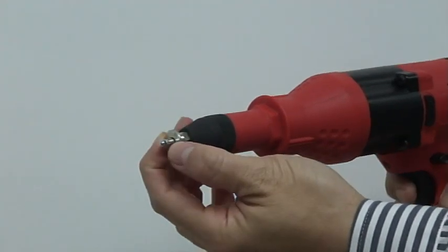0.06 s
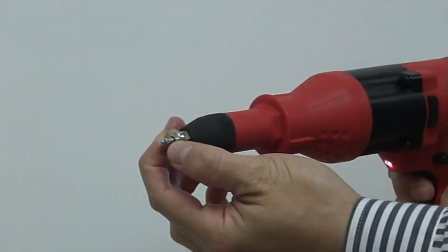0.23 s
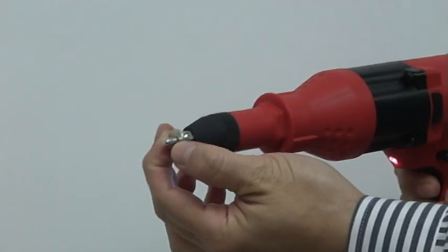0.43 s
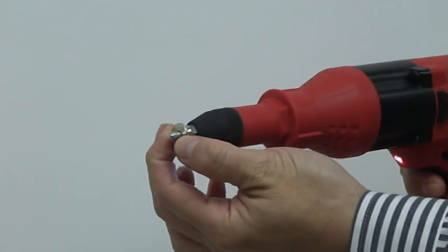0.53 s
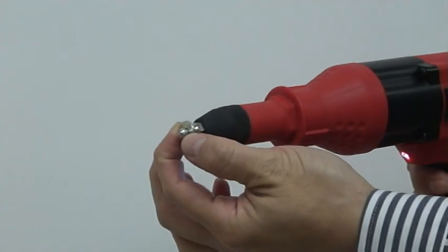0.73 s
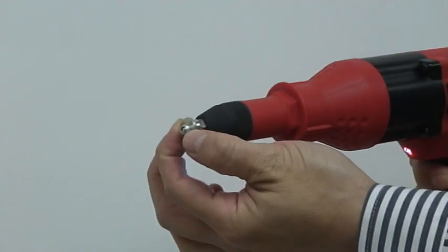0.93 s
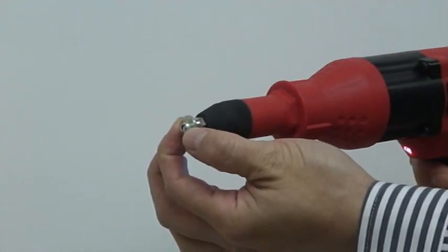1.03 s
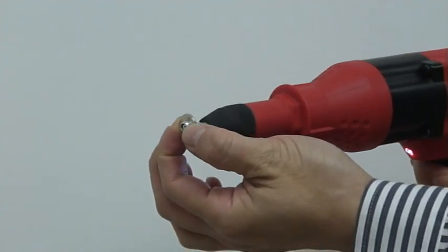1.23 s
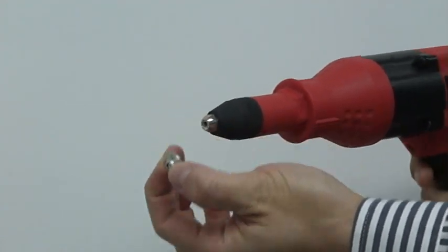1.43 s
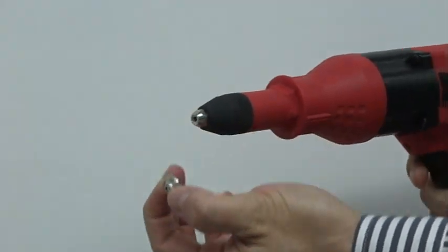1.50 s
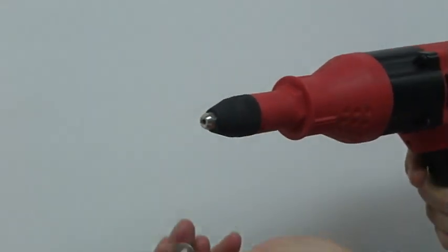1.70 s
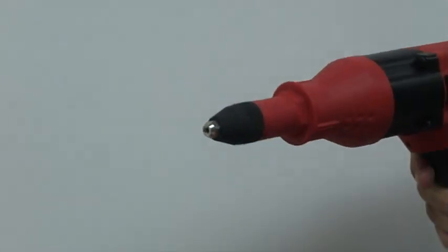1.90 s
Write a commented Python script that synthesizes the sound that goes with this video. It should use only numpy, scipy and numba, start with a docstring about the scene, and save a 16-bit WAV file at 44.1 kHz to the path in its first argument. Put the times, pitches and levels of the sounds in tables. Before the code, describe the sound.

A cordless rivet gun whines up, rattles rapidly, snaps a rivet and winds down.

```python
"""A cordless rivet gun sets one rivet near a wall in a bare room. The trigger clicks, the motor whines
up through its gears and the jaws bite. The loaded drive knocks about forty times a second, ringing the
casing, until the mandrel snaps. Freed, the motor speeds up again, then winds down as the room rings on
over a low rumble of air. An automatic gain control ducks under the knocking and slowly recovers."""
import sys
import numpy as np
from scipy import signal
from scipy.fft import rfft, irfft
from scipy.io import wavfile
from scipy.ndimage import uniform_filter1d
from numba import njit

SR = 44100
rng = np.random.default_rng(int(sys.argv[2]) if len(sys.argv) > 2 else 0)


def transcribe(signal):
    """Save signal, clipped to [-1, 1], as a 16-bit WAV file at the path in sys.argv[1]."""
    frames = np.atleast_2d(signal).T
    limited = np.clip(frames, -1, 1)
    pcm = np.round(limited * 32767).astype(np.int16)
    wavfile.write(sys.argv[1], SR, pcm)


N = 85995

# motor speed, heard as the pitch of the meshing gears: time_s, pitch_hz
MESH_PITCH = [(.15, 700), (.2, 2437), (.238, 3290), (.27, 3750), (.3, 4049), (.33, 4165), (.348, 4100),
              (.37, 3790), (.42, 2400), (1.07, 2650), (1.13, 3820), (1.178, 4200), (1.23, 4390),
              (1.275, 4440), (1.31, 4340), (1.345, 4050), (1.4, 2400), (1.5, 500)]
# envelope of the gear whine: time_s, level_db
WHINE_LEVEL = [(.14, -110), (.18, -42), (.21, -55), (.245, -32.5), (.268, -26.5), (.33, -26), (.365, -25),
               (.4, -57), (1.1, -48), (1.18, -24.5), (1.27, -32.5), (1.34, -25), (1.37, -43), (1.44, -110)]
# low partials of the whine: mesh_multiple, level_db
WHINE_PARTIALS = [(.3333, -15), (1, 0)]
# second and third harmonics against the mesh tone: time_s, level_db
OVERTONE_LEVEL = [(.27, -17), (.33, -22), (1.15, -12), (1.3, -11)]
# the planet gears wobble the whine, most as the jaws take hold: time_s, depth
WHINE_WOBBLE = [(.32, 0.051), (.34, 1), (.355, 0.85), (.38, .2)]
# envelope of the gear rattle: time_s, level_db
RATTLE_LEVEL = [(.12, -70.5), (.158, -51), (.195, -34), (.25, -32), (.3, -27.5), (.345, -29), (.372, -13),
                (.41, -15), (.7, -21), (1.06, -19.5), (1.12, -19.5), (1.2, -23), (1.345, -25),
                (1.42, -34.5), (1.53, -40), (1.68, -77.5)]
# bright scrape against the plain rattle: time_s, balance_db
SCRAPE_BALANCE = [(.15, -7.5), (.3, 2), (.36, -0.5), (.42, -3), (1.08, -1.5), (1.13, -4), (1.35, -4.5),
                  (1.45, -30)]
# tone of the rattling and of the scraping teeth: frequency_hz, gain_db
RATTLE_EQ = [(100, -42.5), (250, -7.5), (600, -1.5), (1200, -2), (2400, 1.5), (3000, 1), (4400, 3.5),
             (4900, -2), (7000, -10.5), (10500, -16), (16000, -84)]
SCRAPE_EQ = [(150, -27), (600, -4), (1300, 5), (3000, -7), (5200, 3), (7000, 2), (8300, -2.5), (9800, 3.5),
             (11000, -2), (12000, 3.5), (14500, -2.5), (16500, -1)]
# tempo of the loaded drive: time_s, knocks_per_s
KNOCK_TEMPO = [(.373, 37.8), (.44, 38), (.49, 39.9), (.7, 40), (.87, 40.3), (.96, 41.9), (1.04, 43.8),
               (1.09, 44)]
# strength of the knocks: time_s, level_db
KNOCK_STRENGTH = [(.373, -1), (.42, -3), (.6, -3), (.85, -4), (.97, -3), (1.06, -3.5), (1.09, -8)]
# lighter gear ticks, placed and balanced against each knock: delay_turns, level_db
OFFBEAT_TICKS = [(.51, -17), (.87, -14)]
# tone of the knocks and trigger clicks: frequency_hz, gain_db
KNOCK_EQ = [(90, -43.5), (250, -12), (500, -9.5), (900, 2.5), (1700, -1), (2400, 2), (4300, 1), (6500, 1),
            (8400, -5), (10000, -1.5), (11000, -2.5), (12200, 0.5), (16500, 0.5)]
# the mandrel snaps and recoils: start_s, level_db
SNAP_HITS = [(1.0937, 2.5), (1.0951, 2.5)]
# tone of the biting jaws, the snapping mandrel and the freed jaws: frequency_hz, gain_db
BITE_EQ = [(100, -20.5), (280, -18), (550, 8.5), (1400, 9.5), (2600, 8.5), (4000, -11), (5200, 5),
           (8000, -14), (16000, -30)]
SNAP_EQ = [(120, -33), (300, -30), (1000, -5), (1800, -5.5), (2350, 5.5), (3000, 0.5), (3900, 6.5),
           (4500, -10), (5300, -24), (9000, -14), (12500, -9.5), (16000, -38)]
SHIVER_EQ = [(300, -30), (1500, -15), (2300, 1.5), (3400, 5), (4500, -14), (8000, -11), (16000, -20)]
# ringing modes of the casing: pitch_hz, t60_s, level_db
CASING_MODES = [(575, 0.07, -1.5), (1208, 0.027, -4.5), (1310, 0.042, -8), (1416, 0.36, -2),
                (1890, 0.055, -13.5), (2028, 0.24, 9.5), (2480, 0.017, -9.5), (3353, 0.017, -7.5),
                (3706, 0.091, 7), (4470, 0.028, -6), (4410, 0.02, -15)]
# motor hum against the rattle: shaft_multiple, level_db
HUM_PARTIALS = [(1.001, -31.5), (1.3326, -36), (1.5, -34)]
# trigger clicks: start_s, level_db
TRIGGER_CLICKS = [(.13, -47.5), (.143, -63)]
# reverb of the bare room: frequency_hz, t60_s, level_db
REVERB_BANDS = [(150, .8, -10.5), (600, 1, -6.5), (2400, 0.98, -6), (4200, 0.82, -8.5), (7060, 1, -9.5),
                (11100, .42, -8.5), (16000, 0.37, -4)]
# tone of the air: frequency_hz, gain_db
AIR_EQ = [(20, -2), (60, -1.5), (150, -0.5), (250, -9), (800, -12.5), (1500, -20), (2500, -21.5),
          (5000, -37), (16500, -27.5)]

TEETH, PLANETS = 15, 3
PULL_START_S, PULL_END_S = .3727, 1.095
SLAP_S, SLAP_DB = .0059, -7  # bounce off the nearby wall


def gear_whine(mesh_cycles, flutter_db=1):
    """Meshing teeth sing a fluttering tone, wobbled by the circling planet gears."""
    overtone_db = curve(OVERTONE_LEVEL)
    whine = 0
    for multiple, db in [*WHINE_PARTIALS, (2, overtone_db), (3, overtone_db - 1)]:
        whine += undb(db + flutter_db * drift(130)) * np.sin(2 * np.pi * multiple * mesh_cycles)
    planet_phase = 2 * np.pi * PLANETS * mesh_cycles / TEETH + 2 * drift(280)
    whine += curve(WHINE_WOBBLE) * np.cos(planet_phase) * np.sin(2 * np.pi * mesh_cycles)
    return np.sqrt(2) * whine * undb(curve(WHINE_LEVEL))


def tooth_ticks(turns, ticks_per_s=9000, spread_db=4, swell_depth=.11):
    """Teeth touch in dense, uneven ticks that swell once per turn of the motor."""
    ticks = (rng.random(N) < ticks_per_s / SR) * rng.choice([-1, 1], N)
    sizes = undb(spread_db * rng.standard_normal(N))
    swell = 1 + swell_depth * np.cos(2 * np.pi * turns)
    return unit_rms(ticks * sizes * swell)


def gear_rattle(turns):
    """The teeth rattle and scrape brightly, blended at equal power."""
    rattle = equalise(tooth_ticks(turns), RATTLE_EQ)
    scrape = equalise(tooth_ticks(turns), SCRAPE_EQ)
    balance = undb(curve(SCRAPE_BALANCE))
    return undb(curve(RATTLE_LEVEL)) * (rattle + balance * scrape) / np.hypot(1, balance)


def drive_knocks(scatter_db=.6):
    """The loaded drive knocks once per turn of its output gear, with lighter ticks in between."""
    t = np.arange(N) / SR
    pulling = (t >= PULL_START_S) & (t < PULL_END_S)
    turns = np.cumsum(curve(KNOCK_TEMPO) * pulling) / SR
    strength_db = curve(KNOCK_STRENGTH)
    hits = []
    for delay_turns, db in [(0, 0), *OFFBEAT_TICKS]:
        onsets = np.flatnonzero(np.diff(np.ceil(turns - delay_turns)))
        scatter = scatter_db * rng.standard_normal(64)[:len(onsets)]
        hits += zip(onsets / SR, strength_db[onsets] + db + scatter)
    return equalise(impacts(hits, hold_s=.0012, decay_s=.0008), KNOCK_EQ)


def jaw_bite(peak_s=.369, rise_s=.0086, fall_s=.00067, level_db=-6):
    """The jaws grind into the mandrel: a quick swell of noise, cut short."""
    t = np.arange(N) / SR - peak_s
    swell = np.exp(np.minimum(t / rise_s, -t / fall_s))
    return undb(level_db) * swell * equalise(rng.standard_normal(N), BITE_EQ)


def mandrel_snap(shiver_db=-14):
    """The mandrel cracks and recoils, and the freed jaws shiver on."""
    snap = equalise(impacts(SNAP_HITS, hold_s=.00039, decay_s=.00029), SNAP_EQ)
    shiver = impacts([(SNAP_HITS[0][0], shiver_db)], hold_s=0, decay_s=.043)
    return snap + equalise(shiver, SHIVER_EQ)


def casing(shake, ring_db=-1.5):
    """The housing adds its ringing modes to whatever shakes it."""
    t = np.arange(N // 8) / SR
    ring = 0
    for hz, t60, db in CASING_MODES:
        damping = np.log(1000) / t60
        gain = undb(db) * 2 * damping / SR
        ring += gain * np.exp(-damping * t) * np.cos(2 * np.pi * hz * t)
    return shake + undb(ring_db) * convolve(shake, ring)


def motor_hum():
    """The shaft hums faintly, louder as the gears work harder."""
    turns = np.cumsum(curve(MESH_PITCH)) / SR / TEETH
    hum = sum(undb(db) * np.sin(2 * np.pi * multiple * turns) for multiple, db in HUM_PARTIALS)
    return undb(curve(RATTLE_LEVEL)) * hum


def trigger():
    """The trigger closes with a soft double click."""
    return equalise(impacts(TRIGGER_CLICKS, hold_s=.0034, decay_s=.0068), KNOCK_EQ)


def room(sound):
    """Bare walls add a diffuse tail whose highest treble dies first."""
    t = np.arange(N) / SR
    hz, t60s, levels_db = np.array(REVERB_BANDS).T
    spectrum = rfft(rng.standard_normal(N))
    log_hz = np.log(np.maximum(np.fft.rfftfreq(N, 1 / SR), 1))
    tail = 0
    for solo, t60, gain in zip(np.eye(len(hz)), t60s, undb(levels_db)):
        band = irfft(spectrum * np.interp(log_hz, np.log(hz), solo), N)
        fade = np.exp(-np.log(1000) * t / t60) * (t > SLAP_S)
        tail += gain * band * fade / np.linalg.norm(fade)
    return sound + convolve(sound, tail)


def air(level_db=-53.5):
    """A low, steady rumble of air beds the scene."""
    return undb(level_db) * equalise(rng.standard_normal(N), AIR_EQ)


def impacts(hits, hold_s, decay_s):
    """Each (start_s, level_db) hit is a brief metal chatter, with a scattered slap off the wall."""
    start_s, level_db = np.array(hits).T
    strikes = np.bincount((start_s * SR).astype(int), undb(level_db), N)
    fade = np.exp(-np.maximum(np.arange(N) / SR - hold_s, 0) / decay_s)
    direct, slap = convolve(strikes, fade) * rng.choice([-1, 1], (2, N))
    return direct + undb(SLAP_DB) * np.roll(slap, int(SLAP_S * SR))


def equalise(sound, points, size=4096):
    """Minimum-phase EQ through (frequency_hz, gain_db) points that keeps the power of white noise."""
    hz, db = np.array(points).T
    grid_hz = np.maximum(np.arange(size // 2 + 1) * SR / size, 1)
    gains = undb(np.interp(np.log(grid_hz), np.log(hz), db))
    cepstrum = irfft(np.log(gains))
    cepstrum[1:size // 2] *= 2
    cepstrum[size // 2 + 1:] = 0
    response = irfft(np.exp(rfft(cepstrum)))
    return convolve(sound, response / np.linalg.norm(response))


def convolve(sound, response):
    """Pass a sound through an impulse response."""
    return signal.fftconvolve(sound, response)[:N]


def curve(rows):
    """Automation line through (time_s, value) rows, one value per sample."""
    return np.interp(np.arange(N) / SR, *np.array(rows).T)


def drift(rate_hz):
    """Smooth random drift with rms 1."""
    size = max(int(SR / rate_hz), 1)
    return unit_rms(uniform_filter1d(uniform_filter1d(rng.standard_normal(N), size), size))


def unit_rms(x):
    """Scale to rms 1."""
    return x / np.sqrt(np.mean(x ** 2))


def undb(db):
    """Decibels to gain."""
    return 10 ** (np.asarray(db) / 20)


@njit
def hold_peaks(level, fall):
    """Follow a level up at once and down slowly."""
    envelope, held = np.empty(len(level)), 0.
    for i in range(len(level)):
        held = max(level[i], held * fall)
        envelope[i] = held
    return envelope


def scene():
    """The rivet gun in its room, over the air, in mono."""
    mesh_hz = curve(MESH_PITCH) * (1 + .0052 * drift(450))  # slight speed jitter
    mesh_cycles = np.cumsum(mesh_hz) / SR
    whine = gear_whine(mesh_cycles)
    shake = gear_rattle(mesh_cycles / TEETH) + trigger() + drive_knocks() + jaw_bite() + mandrel_snap()
    gun = casing(shake) + whine + motor_hum()
    return (room(gun) + air())[None]


def record(dry):
    """Gain control with a fast grip and slow release, then a steep top cut."""
    threshold_db, detect_s, release_s, top_hz = -20, .0032, .57, 16600
    level = np.sqrt(np.abs(uniform_filter1d(dry[0] ** 2, int(detect_s * SR))))
    held = hold_peaks(level, np.exp(-1 / (release_s * SR)))
    ducked = dry / np.maximum(held / undb(threshold_db), 1)
    top_cut = signal.ellip(10, .2, 70, top_hz, fs=SR, output="sos")
    return signal.sosfilt(top_cut, ducked)


dry = scene()
out = record(dry)
transcribe(out)
```